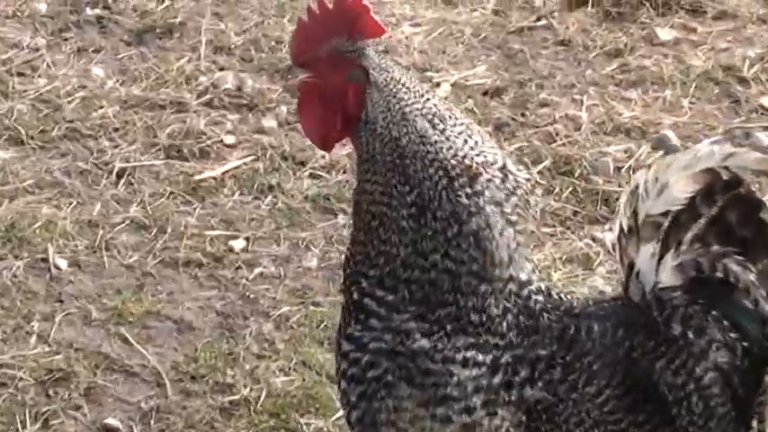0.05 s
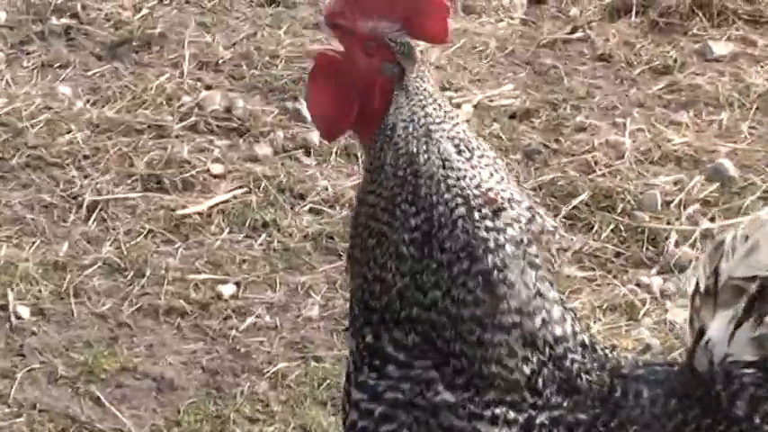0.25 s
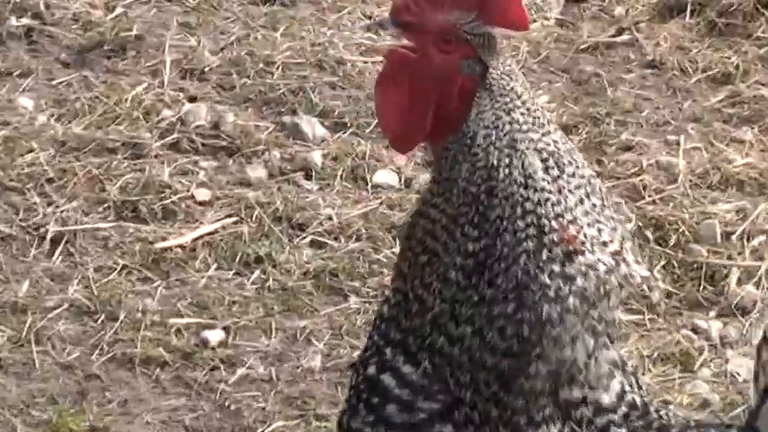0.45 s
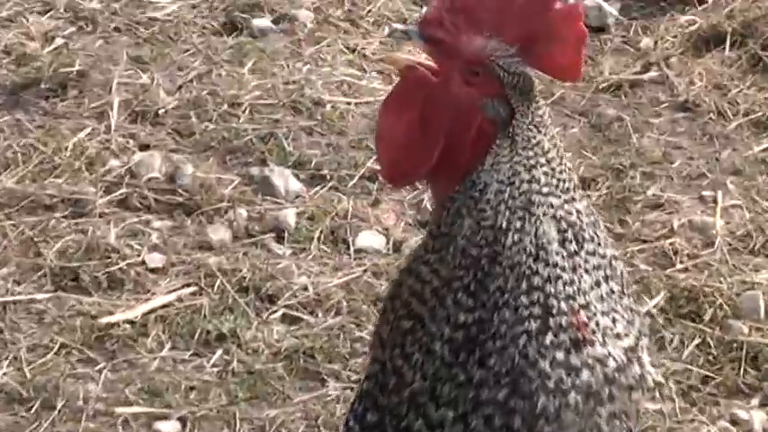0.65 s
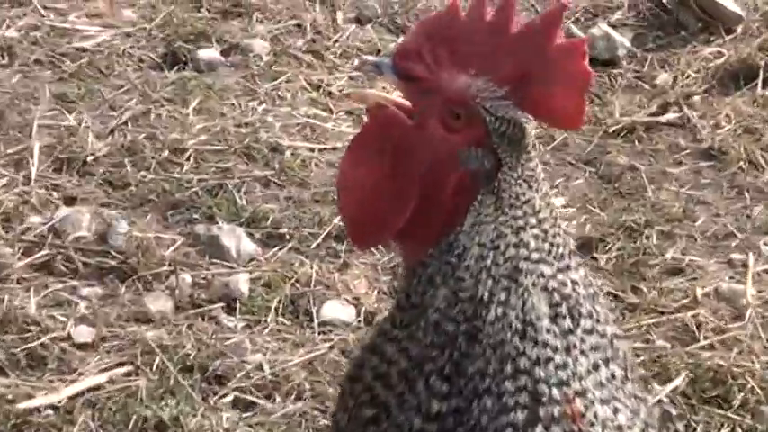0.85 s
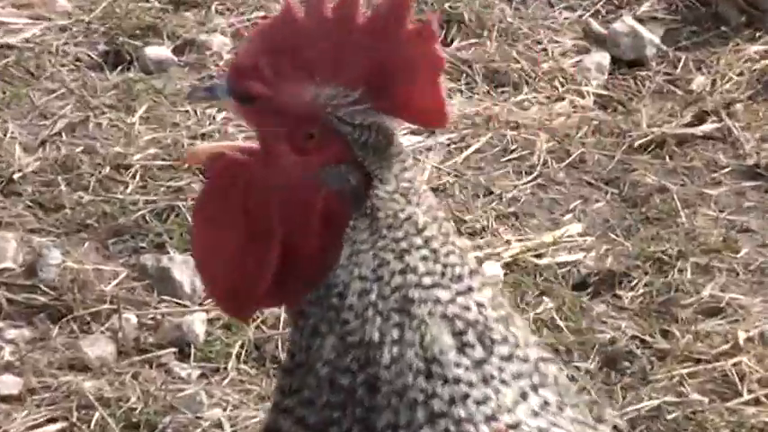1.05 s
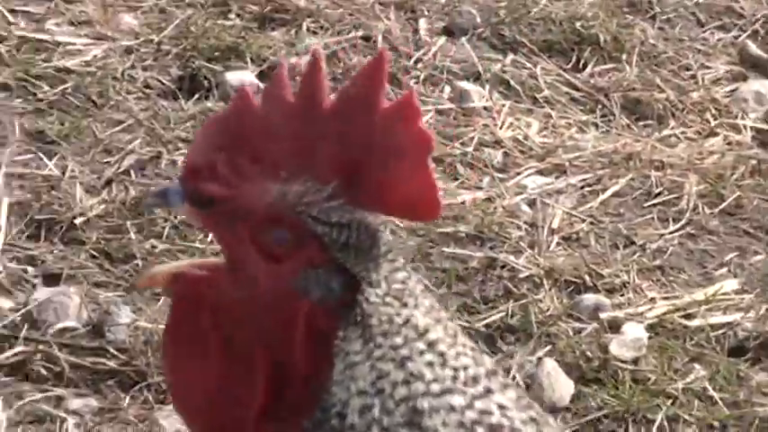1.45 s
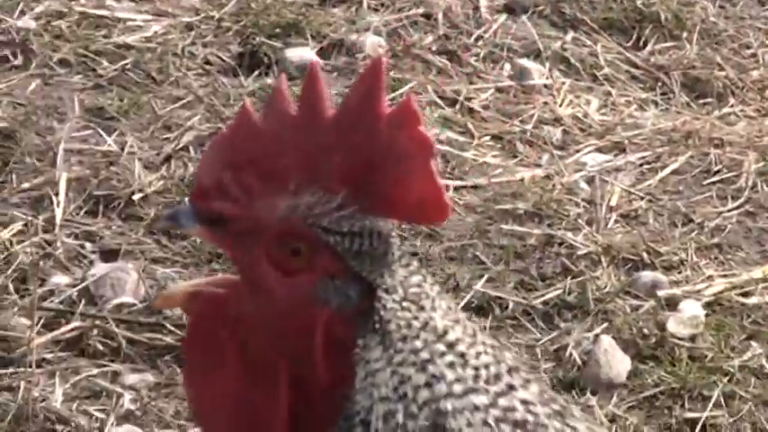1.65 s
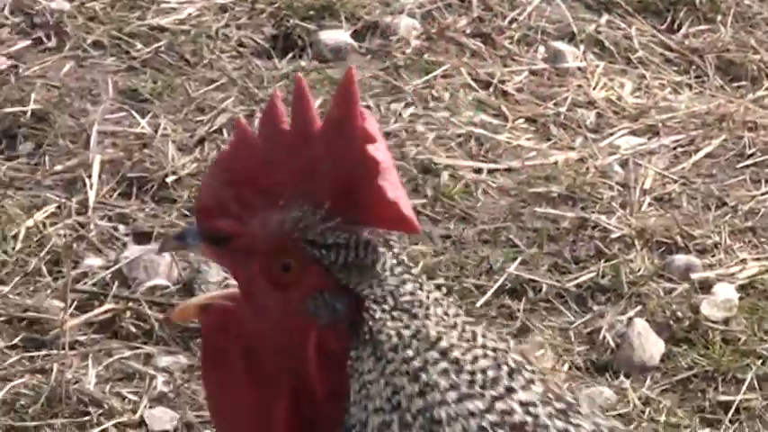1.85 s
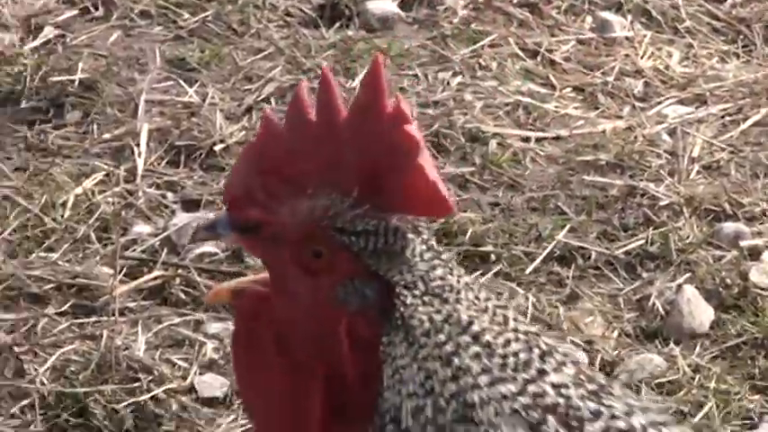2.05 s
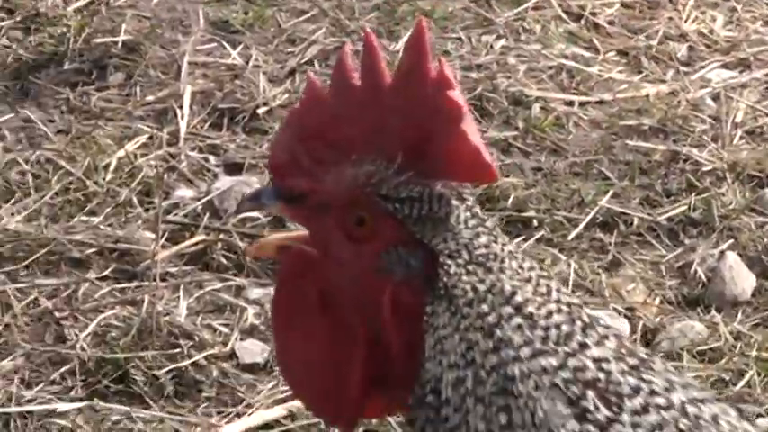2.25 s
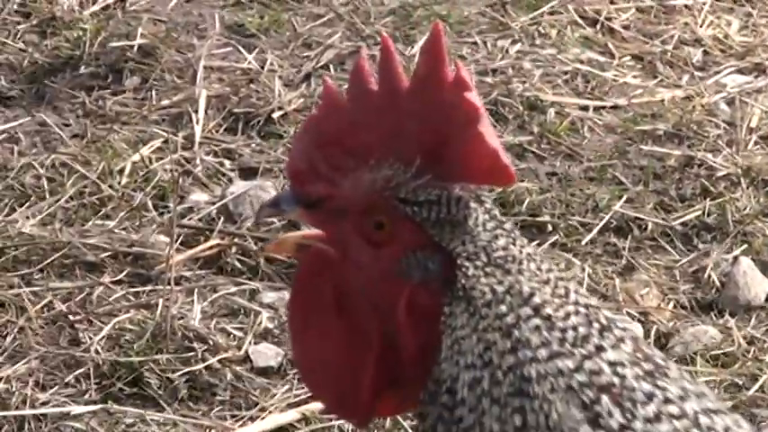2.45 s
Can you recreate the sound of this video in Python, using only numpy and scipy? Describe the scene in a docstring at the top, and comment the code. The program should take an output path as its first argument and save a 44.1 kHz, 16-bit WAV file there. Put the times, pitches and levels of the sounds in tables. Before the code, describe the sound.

A rooster crows close to the microphone in an open yard: a short note, then a long, loud call that turns hoarse and sags into a growl. A faint low outdoor rumble lies underneath.

```python
"""A rooster crows in a yard

Close by, he gives a short note, then a long call that turns hoarse and sags into a growl.
His voice box (the syrinx) makes two strong low tones and uneven pulses that ring his throat and beak;
now and then the voice breaks into a squeak. The open yard returns a faint echo over a low rumble,
and a far rooster starts to answer."""
import sys
import numpy as np
from scipy import signal
from scipy.fft import rfft, irfft
from scipy.io import wavfile

SR = 44100
rng = np.random.default_rng(int(sys.argv[2]) if len(sys.argv) > 2 else 0)


def wav_out(sig):
    """Save sig, one row per channel (or a flat mono array), as 16-bit PCM at SR to the path in sys.argv[1]."""
    wavfile.write(sys.argv[1], SR, np.round(np.clip(np.atleast_2d(sig).T, -1, 1) * 32767).astype(np.int16))


N = 114660
TIME = np.arange(N) / SR
FREQS = np.maximum(np.arange(N // 2 + 1) * SR / N, 1)  # Hz along a spectrum
NOTE_S, CALL_S = (0.1898, 0.334), (0.4887, 2.343)  # start and end

# Relative levels in the short note: t/s, first tone/dB, second tone/dB, rasp/dB
NOTE_LEVELS = [(0.188, -41, -34, -41.5), (0.282, -20.5, -20.5, -45), (0.355, -31, -33, -42)]
# How rough the voice is: t/s, hoarseness (0 is clear)
HOARSENESS = [(.21, 0.15), (.29, 0.5), (.33, 1.33), (.49, 0.07), (.6, 0.5), (.67, 0.73), (.93, 0.71),
              (.975, 0.07), (1.03, 1.08), (1.5, 0.87), (1.87, 1.07), (1.92, 0.56), (2.1, 0.27), (2.2, 0.81)]


def undb(db):
    """Turn decibels into a gain."""
    return 10 ** (np.asarray(db) / 20)


def unit(x):
    """Scale a sound to an average (rms) level of 1."""
    return x / np.sqrt(np.mean(x ** 2))


def curve(rows, column=1):
    """Follow one column of a table through time, in straight lines."""
    rows = np.array(rows, float)
    return np.interp(TIME, rows[:, 0], rows[:, column])


def over_hz(points):
    """Join (f/Hz, value) points into a curve across the spectrum."""
    hz, values = np.array(points, float).T
    return np.interp(np.log(FREQS), np.log(hz), values)


def ring(x, gain):
    """Filter by a gain per frequency, so that ringing follows each push and never comes before it."""
    cepstrum = irfft(np.log(gain + 1e-7), N)
    cepstrum[1:N // 2] *= 2
    cepstrum[N // 2 + 1:] = 0
    return irfft(rfft(x) * np.exp(rfft(cepstrum)), N)


def band_noise(hz, width_hz):
    """Noise of level 1 around one frequency."""
    spectrum = rfft(rng.standard_normal(N))
    return unit(irfft(spectrum / (1 + (2 * (FREQS - hz) / width_hz) ** 2), N))


def gate(start, end, attack_s=0.0026, release_s=0.019):
    """Switch on quickly, hold, then die away."""
    return np.clip((TIME - start) / attack_s, 0, 1) * np.exp(-np.maximum(TIME - end, 0) / release_s)


def effort(note_db, call_db):
    """The gain through the short note and the long call."""
    return gate(*NOTE_S) * undb(note_db) + gate(*CALL_S) * undb(call_db)


def yard():
    """A low outdoor rumble with a wavering hum."""
    # Tone colour of the rumble: f/Hz, relative level/dB
    colour = [(21, -34), (35, -17.5), (250, -7.5), (436, -13.5), (686, -14.5), (14500, -48.5)]
    # Its slow swell: t/s, level/dB
    swell = [(0, -51.5), (.9, -43.5), (2.1, -51.5)]
    rumble = unit(ring(rng.standard_normal(N), undb(over_hz(colour))))
    hum = undb(-59.5) * band_noise(174.3, width_hz=11)
    return rumble * undb(curve(swell)) + hum


def rooster():
    """The whole crow: the voice box vibrates at a gliding, slightly shaky pitch."""
    # Pitch of the short note: t/s, f/Hz
    note_pitch = [(.186, 405.4), (.21, 473), (.23, 474.4), (.28, 504), (.305, 508), (.35, 479.6)]
    # Pitch of the long call: t/s, f/Hz
    call_pitch = [(.488, 450.3), (.505, 475.5), (.513, 578.7), (.6, 568.1), (.68, 545.9), (.85, 567.8),
                  (.92, 542.6), (.98, 568.1), (1.03, 513), (1.29, 533.8), (1.46, 540.8), (1.84, 505.2),
                  (1.98, 486.7), (2.2, 445.8), (2.35, 375)]
    waver = 1 + 0.00861 * band_noise(20.73, width_hz=51.6)
    cycles = np.cumsum(curve(note_pitch + call_pitch) * waver) / SR  # vibrations so far
    squeak, takeover = squeaks()
    rush = undb(-24) * rasp_gain() * band_noise(360, width_hz=750)
    return low_tones(cycles, takeover) + dulling(rasp(cycles)) + rush + flares(cycles) + squeak + growl(cycles)


def fluttering_tone(cycles, below=1):
    """A tone that flutters when the voice is hoarse; `below` weighs the flutter under its pitch."""
    depth = 0.64 * curve(HOARSENESS)
    up, down = (signal.hilbert(band_noise(63.4, width_hz=67)) for _ in range(2))
    flutter = (up + below * down.conj()) / np.sqrt(2 + 2 * below ** 2)
    tone = np.real((1 + depth * flutter) * np.exp(2j * np.pi * cycles))
    return tone * np.sqrt(2 / (1 + depth ** 2))


def low_tones(cycles, takeover):
    """The voice box sounds its pitch and the octave above; the first gives way to squeaks."""
    # First tone in the long call: t/s, relative level/dB
    call_first = [(.492, -50), (.515, -14.5), (.62, -16), (.66, -21.5), (.72, -15.5), (.845, -17),
                  (.88, -22), (.94, -20.5), (.975, -18), (1.04, -24), (1.74, -23), (2.2, -31.5), (2.3, -37)]
    # Second tone in the long call: t/s, relative level/dB
    call_second = [(.49, -25), (.503, -15.5), (.52, -29.5), (.92, -32), (1.06, -27.5), (1.92, -26),
                   (2.05, -33.5), (2.3, -41.5)]
    first_gain = undb(-2) * effort(curve(NOTE_LEVELS), curve(call_first)) * (1 - takeover)
    second_gain = undb(0.5) * effort(curve(NOTE_LEVELS, column=2), curve(call_second))
    return first_gain * fluttering_tone(cycles, below=0.075) + second_gain * fluttering_tone(2 * cycles)


def pulses(cycles):
    """The voice box clicks once a cycle, unevenly when hoarse, and falls out of step in a last croak."""
    croak_from_s, octave_until_s = 2.125, (0.215, 0.507)
    beats = np.arange(2, int(2 * cycles[-1])) / 2  # every half cycle
    timing_luck, size_luck = rng.standard_normal((len(beats), 2)).T
    at = np.searchsorted(cycles, beats)
    when, hoarse = at / SR, curve(HOARSENESS)[at]
    scatter_cycles = np.where(when > croak_from_s, 0.13, 0.075 * hoarse)
    place = np.interp(beats + scatter_cycles * timing_luck, cycles, np.arange(N))
    # Each note starts an octave high: two half-size clicks a cycle.
    high = sum((when > start) & (when < end) for start, end in zip((0, NOTE_S[1]), octave_until_s))
    size = undb(1.5 * hoarse * size_luck) * np.where(high, 0.5, beats % 1 == 0)
    # Spread each click over 16 samples so it can fall between two of them.
    taps = place.astype(int)[:, None] + np.arange(-7, 9)
    offset = taps - place[:, None]
    clicks = np.zeros(N)
    np.add.at(clicks, np.clip(taps, 0, N - 1), size[:, None] * np.sinc(offset) * np.sinc(offset / 8))
    return unit(clicks - clicks.mean())


def rasp_gain():
    """How strong the rough part of the voice is at each moment."""
    # Rasp in the long call: t/s, relative level/dB
    call_rasp = [(.49, -31), (.97, -31.5), (1.2, -28.5), (1.86, -31.5), (1.92, -35.5), (2.16, -36.5),
                 (2.3, -35.5)]
    return effort(curve(NOTE_LEVELS, column=3), curve(call_rasp))


def rasp(cycles):
    """Pulses and puffs of air ring the throat and windpipe; the hoarse voice throbs."""
    air_from_hz, throb_db = 6500, 1.7
    puffs = undb(2) * rng.standard_normal(N) * (1 + np.cos(2 * np.pi * cycles))
    voiced = 1 / np.hypot(1, (FREQS / air_from_hz) ** 2)
    source = ring(pulses(cycles), voiced) + ring(puffs, np.sqrt(1 - voiced ** 2))
    throb = undb(throb_db * curve(HOARSENESS) * band_noise(28, width_hz=28))
    return throb * (throat(source) * rasp_gain() + windpipe(source))


def throat(source):
    """Throat and beak pass through six shapes, each favouring different frequencies."""
    # Tone colour of each shape: f/Hz, relative level/dB
    opening = [(700, -19.5), (1900, -3.5), (2200, -14), (2750, -4), (3300, -29), (4650, -14), (6200, -48),
               (7400, -29.5), (14500, -51)]
    short_note = [(680, -17.5), (1150, 0.5), (1500, 0), (1630, -7.5), (1930, -3.5), (2170, -25), (2490, -4),
                  (2990, -36), (3430, -22), (4110, -29), (5290, -24), (7670, -35), (11600, -31.5),
                  (14500, -50)]
    stretched = [(470, -79.5), (800, 0), (1100, 1), (1190, -3), (1330, 7.5), (1620, -12.5), (1830, 1.5),
                 (2030, -17.5), (2720, -14), (3040, -32), (3450, -9), (4300, -35), (4700, -27.5),
                 (6100, -50), (8400, -33), (9700, -43), (11400, -35), (14500, -62)]
    wide = [(470, -71), (800, -6.5), (1040, -0.5), (1320, -8), (1780, -4), (2110, -24), (2750, -23.5),
            (2930, -36), (3870, -21.5), (4990, -48), (6510, -37), (7090, -49), (7630, -43.5), (14500, -57)]
    easing = [(470, -64.5), (750, -15), (1030, -10), (1320, -19.5), (1580, -5.5), (1820, -26), (2110, -22),
              (2270, -42), (3600, -38), (4060, -45.5), (5170, -32), (5770, -52.5), (6590, -42.5),
              (7090, -61), (7720, -41.5), (8300, -53), (14500, -62)]
    closing = [(260, -31.5), (520, 4.5), (650, 8.5), (841, -20), (931, 0), (1050, -1.5), (1210, 11),
               (1380, -10.5), (1660, 7.5), (1900, -39), (2650, -21), (2950, -36), (3980, -39.5),
               (4470, -25), (5400, -23), (6900, -45.5), (8590, -41.5), (14500, -52.5)]
    # Moves from one shape to the next: midpoint t/s, duration/s
    moves = [(0.217, 0.019), (0.43, 0.019), (1.032, 0.079), (1.421, 0.52), (1.921, 0.3)]
    # Balance of each shape: level/dB, extra bass/dB, spacing of windpipe resonances/Hz
    balance = [(8, 9.5, 945), (8.5, 3.5, 1020), (-0.5, -2, 940), (-3, -1.5, 1090), (-3, -0.5, 1098),
               (1, -3.5, 1075.5)]
    bass_edge_hz, ripple_db, full_ripple_hz = 1597, 4.5, 7000
    progress = [np.clip((TIME - middle) / length + 0.5, 0, 1) for middle, length in moves]
    reached = [np.ones(N)] + progress + [np.zeros(N)]
    bass = 1 / (1 + (FREQS / bass_edge_hz) ** 12)
    ripple_depth = ripple_db * np.minimum(FREQS / full_ripple_hz, 1) ** 2
    sound = 0
    for k, colour in enumerate([opening, short_note, stretched, wide, easing, closing]):
        share = np.maximum(reached[k] - reached[k + 1], 0)
        db, bass_db, spacing_hz = balance[k]
        pipe_db = ripple_depth * np.cos(2 * np.pi * FREQS / spacing_hz)
        voice = ring(source, undb(over_hz(colour) + bass_db * bass + pipe_db))
        treble = irfft(rfft(voice) * (1 - bass), N)
        treble_level = np.sqrt(np.average(treble ** 2, weights=share))
        sound += share * undb(db) * voice / treble_level
    return sound


def echo(x):
    """The yard scatters the sound back, fainter and duller."""
    delay_s, fade_60db_s, top_hz = 0.022, 0.33, 7000
    tail = rng.standard_normal(N) * (TIME > delay_s) * np.exp(-np.log(1000) * TIME / fade_60db_s)
    returns = signal.fftconvolve(x, tail / np.sqrt(np.sum(tail ** 2)))[:N]
    return undb(-13.5) * ring(returns, 1 / np.hypot(1, (FREQS / top_hz) ** 2))


def flares(cycles):
    """An overtone flares up briefly as it crosses a throat resonance."""
    # Flares: t/s, half length/s, multiple of the pitch, level/dB
    crossings = [(0.22, 0.0091, 4, -18), (0.501, 0.0068, 4, -23)]
    sound = 0
    for when, half_length, multiple, db in crossings:
        swell = np.exp(-((TIME - when) / half_length) ** 2)
        sound += undb(db) * swell * np.sin(2 * np.pi * multiple * cycles)
    return effort(0, 0) * sound


def windpipe(source):
    """The pulses keep narrow, brassy rings alive; each sinks slowly as the neck eases."""
    # Windpipe rings: start t/s, end t/s, starting f/Hz, level/dB
    rings = [(0.244, 0.333, 3403, -43.5), (0.491, 1.024, 2740, -38.5), (0.498, 1.034, 3823, -39.5),
             (1.099, 1.847, 3664, -54.5), (1.938, 2.322, 4490, -49.5)]
    sag_per_s, width_hz = 0.062, 100
    narrow = signal.butter(2, width_hz / 2, fs=SR, output="sos")
    sound = 0
    for start, end, hz, db in rings:
        pitch = hz * (1 - sag_per_s * (TIME - start))
        spin = np.exp(2j * np.pi * np.cumsum(pitch) / SR)
        # Shift the ring's pitch down to 0 Hz, keep a narrow band, shift it back.
        ringing = np.real(spin * signal.sosfilt(narrow, source / spin))
        held = gate(start, end)
        sound += undb(db) * held * ringing / np.sqrt(np.average(ringing ** 2, weights=held))
    return sound


def squeaks(half_length_s=0.0075):
    """A high vibration briefly takes over the voice; gives its sound and how far it takes over."""
    # Voice breaks: t/s, peak level/dB, f/Hz
    breaks = [(.634, -26, 1366), (.663, -20, 1370), (.693, -16.5, 1320), (.722, -17, 1292),
              (.747, -16.5, 1280), (0.775, -27, 1260), (0.809, -18.5, 1340), (0.9, -16, 1363),
              (1.181, -19, 1320), (1.251, -19.5, 1325), (1.297, -18.5, 1350), (1.46, -24, 1134),
              (1.73, -19, 1174), (2.235, -16.5, 1641), (2.293, -18, 1206), (2.338, -27.5, 625)]
    sound, takeover = np.zeros(N), np.zeros(N)
    for when, db, hz in breaks:
        swell = np.exp(-((TIME - when) / half_length_s) ** 2)
        sound += undb(db) * swell * np.sin(2 * np.pi * hz * (TIME - when))
        takeover += swell
    return sound, np.clip(takeover, 0, 1)


def growl(cycles):
    """Late in the call the voice box's other side sounds its own pitch and beats against the first."""
    # The second voice: t/s, f/Hz, level/dB
    voice = [(1.95, 1727, -31.5), (2.115, 1650, -26.5), (2.135, 1697, -33), (2.235, 1654, -30.5),
             (2.34, 1564, -41)]
    # Beat tones, one and two times the main pitch below it: relative level/dB
    beat_levels = [-14, -5.5]
    own_cycles = np.cumsum(curve(voice)) / SR
    beats = sum(undb(db) * fluttering_tone(own_cycles - k * cycles)
                for k, db in enumerate(beat_levels, 1))
    swell = gate(voice[0][0], voice[-1][0]) * undb(curve(voice, column=2))
    return swell * (fluttering_tone(own_cycles) + beats)


def dulling(x, start_s=2.297, fade_s=0.036, edge_hz=1040):
    """As the call dies, the treble fades ahead of the bass."""
    treble = irfft(rfft(x) * (1 - 1 / (1 + (FREQS / edge_hz) ** 6)), N)
    lost = 1 - np.exp(-np.maximum(TIME - start_s, 0) / fade_s)
    return x - treble * lost


def far_rooster():
    """A faint rising answer, dulled by distance."""
    # The far call: t/s, f/Hz, level/dB
    answer = [(2.4, 558.6, -60), (2.6, 641, -52)]
    phase = 2 * np.pi * np.cumsum(curve(answer)) / SR
    swell = gate(answer[0][0], answer[-1][0]) * undb(curve(answer, column=2))
    return swell * np.sqrt(2) * (np.sin(phase) + undb(-20) * np.sin(2 * phase))


def scene():
    """Both roosters and the yard in stereo; echo and rumble differ a little between left and right."""
    # The balance shifts as he turns: t/s, left minus right/dB
    pan = [(.2, .5), (.6, 1.6), (2.1, 0)]
    phase_gap_rad = -0.23  # left minus right
    bird = rooster()
    spectrum = rfft(bird + echo(bird) + far_rooster() + yard())
    sides = np.array([[1], [-1]])
    stereo = irfft(spectrum * np.exp(0.5j * sides * phase_gap_rad), N) * undb(sides * curve(pan) / 2)
    spread = undb(-4) * echo(bird) + undb(-11.5) * yard()
    return stereo + sides * spread


def record(dry, top_hz=14400):
    """Cut off the highest treble."""
    return signal.sosfilt(signal.ellip(8, 0.2, 70, top_hz, fs=SR, output="sos"), dry)


dry = scene()
out = record(dry)
wav_out(out)
```